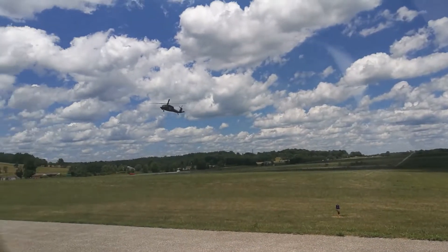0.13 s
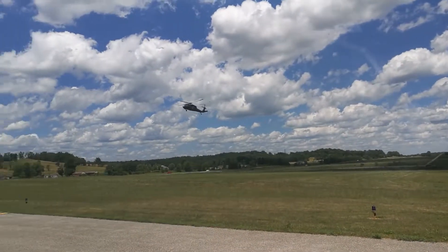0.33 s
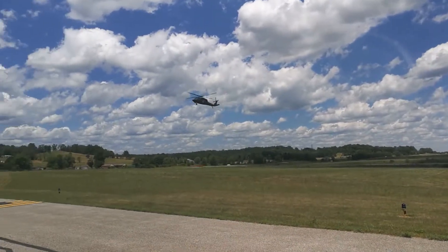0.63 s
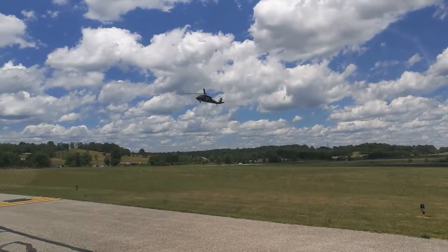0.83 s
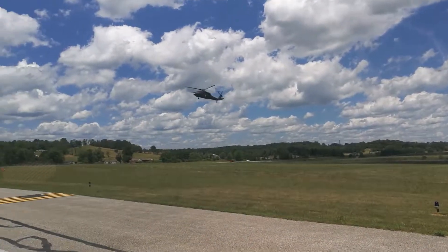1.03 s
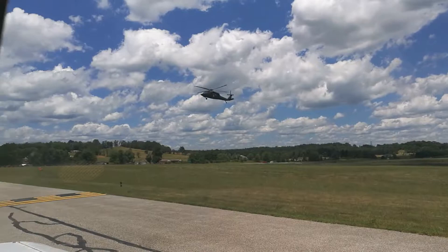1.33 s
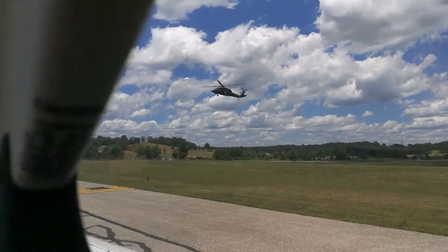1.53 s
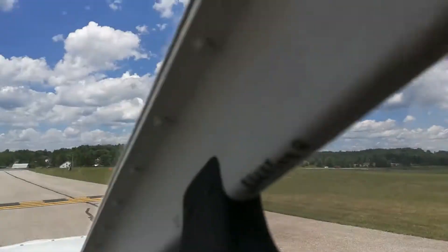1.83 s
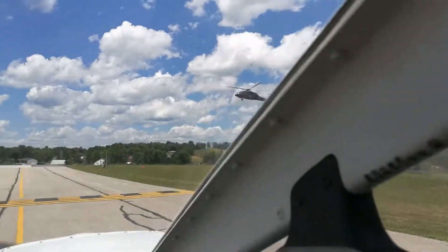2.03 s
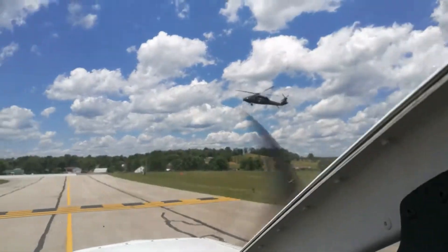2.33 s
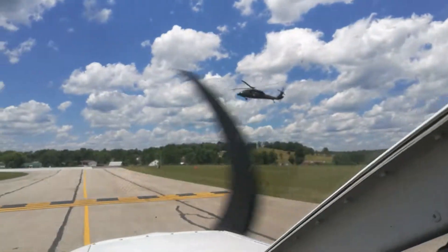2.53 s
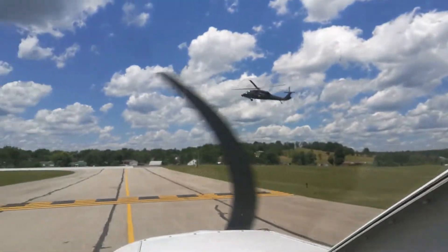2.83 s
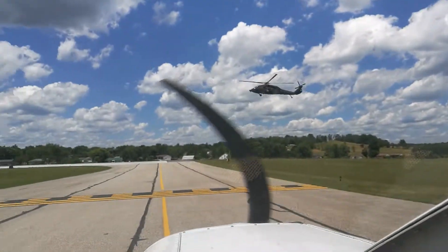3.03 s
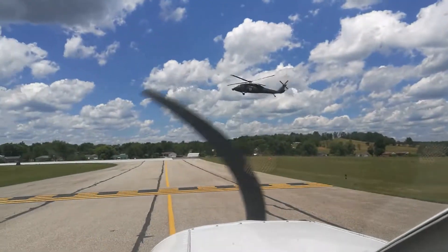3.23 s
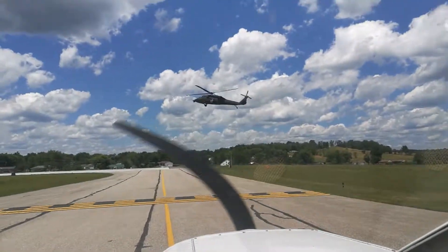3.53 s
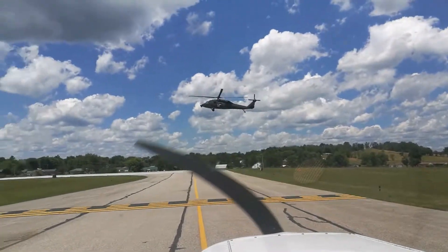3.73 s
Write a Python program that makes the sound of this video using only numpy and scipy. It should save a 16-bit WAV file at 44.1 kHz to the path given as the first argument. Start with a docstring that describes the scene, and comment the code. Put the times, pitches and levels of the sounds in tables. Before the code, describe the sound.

Small aircraft piston engine idling, low fluttering drone with rattling knocks and airy hiss in the cabin.

```python
"""Cabin of a small plane, its four-cylinder engine idling at about 900 rpm.
Propeller and exhaust throb once per firing (harmonics); rattle and knocks repeat every four firings
(looped noise; hits into resonators). Roar and slipstream hiss are noise bands pulsing with the blades,
over faint whines and a rumble. The microphone turns from side window to windscreen; now and then
something brushes it (noise bursts), and once the sound skips with a click."""
import sys
import numpy as np
from scipy import signal
from scipy.fft import irfft, next_fast_len
from scipy.io import wavfile

SR = 44100
rng = np.random.default_rng(int(sys.argv[2]) if len(sys.argv) > 2 else 0)


def bounce(signal):
    """Save signal as a 16-bit WAV file at the path given by the first command-line argument."""
    frames = np.transpose(np.atleast_2d(signal))
    limited = np.clip(frames, -1, 1)
    pcm = np.round(limited * 32767).astype(np.int16)
    wavfile.write(sys.argv[1], SR, pcm)


N = 171549

# Timing; the skip drops SKIP_SAMPLES, so the sources run that much longer.
FIRST_FIRING_S, FIRING_HZ, SPEEDUP_HZ_PER_S = 0.0134, 29.796, 0.021
CYLINDERS = 4  # firings per engine cycle
SKIP_S, SKIP_SAMPLES, JOIN_S = 1.4233, 1024, 0.00002
LENGTH = N + SKIP_SAMPLES
TIME_S = np.arange(LENGTH) / SR
FIRINGS = (TIME_S - FIRST_FIRING_S) * (FIRING_HZ + SPEEDUP_HZ_PER_S * TIME_S / 2)  # running count

# Microphone direction: start_s, turn (0 side window, 1 windscreen)
MIC_TURN = [(0, 0.062), (1.2, 0.082), (1.7, 0.29), (2.3, .6), (2.9, 0.86), (3.89, 0.98)]

# Throb, one row per multiple of the firing rate: side_peak_db, ahead_peak_db
THROB_HARMONICS = [(-18, -29.5), (-25.5, -22.5), (-16.5, -15.5), (-24, -26), (-23.5, -24), (-33, -48.5),
                   (-46.5, -72), (-57, -54), (-43, -41.5), (-49.5, -46.5)]
THROB_WOBBLE_DB, LOWEST_WOBBLE_DB, WOBBLE_HZ = 0.64, 4, 1.7

# Knocks of one engine cycle: place_firings, low_side_db, low_ahead_db, high_side_db, high_ahead_db
CYCLE_KNOCKS = [(0.172, 6.5, -12.5, -1, -4.5), (0.562, -4.5, -8.5, -2, -8.5), (1.129, 2.5, -5.5, 3, 3.5),
                (1.5, 0.5, -5, -7, -11.5), (2.149, 1, -8.5, -11, -6), (2.979, -2.5, -36, -8, -14)]
# Harder knocks: start_s (after the skip is cut), extra_db
HARD_KNOCKS = [(1.504, 1.5), (1.638, 5.5), (2.308, 2.5), (2.844, 0), (3.112, 1.5), (3.648, 7), (3.782, 5.5)]
# Resonances the knocks ring: centre_hz, width_hz, level_db, left_minus_right_db
LOW_RESONANCES = [(728, 49, -6, 15.5), (833, 150, -2, 15), (973, 41, 1.5, 7.5), (1047, 71, -0.5, -1.5),
                  (1145, 36, -4, 13)]
HIGH_RESONANCES = [(1494, 58, -1.5, 7.5), (1675, 24, 2.5, 6.7), (1848, 107, 2.5, 4.7),
                   (2344, 27, -6.5, 4.1)]
LOW_RING_RMS_DB, HIGH_RING_RMS_DB = -33.5, -39
LOW_TAIL_S, HIGH_TAIL_S = 0.0067, 0.011
LOW_GRIT, HIGH_GRIT = 0.39, 1  # noisy tail against clean hit
KNOCK_SPREAD_DB, KNOCK_JITTER_S = 0.1, 0.0005

# Rattle spectrum: freq_hz, density_db
RATTLE_SPECTRUM = [(40, -24), (105, 3), (160, 5.5), (205, 0), (260, 4), (370, -2.5), (480, -0.5), (590, -7),
                   (700, 0.5), (850, -8.5), (1100, -10.5), (1400, -19), (4000, -39)]
RATTLE_RMS_DB = -33

# Engine roar spectrum: freq_hz, density_db
ROAR_SPECTRUM = [(120, -17), (200, 4), (255, 3.5), (320, -4), (400, -5.5), (475, 1), (560, -3.5), (650, -5),
                 (770, -3.5), (880, -8.5), (1030, -5), (1200, -9), (1600, -24), (4000, -62)]
ROAR_SIDE_DB, ROAR_AHEAD_DB = -38, -31.5
# Slipstream hiss spectra, facing side window, door post, windscreen: freq_hz, density_db
HISS_SIDE_SPECTRUM = [(740, -32), (1250, -10), (1420, -7), (1730, 0.5), (1890, -8.5), (2030, -3.5),
                      (2330, -16), (2460, -22), (2790, -11.5), (3200, -27), (3480, -15), (4080, -23),
                      (4440, -22), (6420, -26.5), (6990, -29), (9300, -33), (10700, -23.5), (12200, -35.5),
                      (15600, -30)]
HISS_POST_SPECTRUM = [(740, -34), (1250, -19), (1330, -18.5), (1400, -4.5), (1480, -3.5), (1630, -8),
                      (1770, 2.5), (1870, 0.5), (2030, -3), (2330, -7), (2540, -13), (2910, -11),
                      (4390, -26.5), (5150, -23), (7450, -31.5), (9910, -27), (12500, -33), (15000, -34),
                      (15600, -34)]
HISS_AHEAD_SPECTRUM = [(740, -39), (1250, -15), (1400, 0), (1560, -3.5), (1870, -1), (1990, 1.5),
                       (2160, -18), (2310, -14), (2760, -14), (2910, -13.5), (3480, -16), (3950, -20),
                       (4260, -18), (4580, -23.5), (6290, -23.5), (7770, -31), (10200, -25), (12400, -32.5),
                       (15600, -32)]
HISS_SIDE_DB, HISS_POST_DB, HISS_AHEAD_DB = -40.5, -38.5, -38
# Colour added to all three hisses: freq_hz, gain_db
HISS_COLOUR = [(900, 3), (1300, 0), (1750, -3), (2100, -0.5), (2600, 0.5), (14000, 0.5)]
# Blade swell of roar and hiss: freq_hz, swell_peak_db
BLADE_SWELL = [(200, -3.5), (1000, 2.5), (2800, 0.6), (5000, 2.24), (12000, 2.2)]
SWELL_PEAK_FIRINGS, TREBLE_SWELL_PEAK_FIRINGS = 0.18, 0.38  # after the throb
ROAR_FLICKER_DB, ROAR_FLICKER_HZ = 1.09, 29

# Whine pitches: pitch_hz
WHINE_PITCHES = (1029, 2315, 3144)
# One row per whine: side_rms_db, post_rms_db, ahead_rms_db, wander_hz
WHINE_LEVELS = [(-45.5, -47, -41.5, 6.25), (-57.5, -49, -60, 10.4), (-65, -56.5, -71, 2.1)]
WHINE_WANDER_RATE_HZ, WHINE_FLUTTER_DB = 12.6, 2.5
# High whistle level: start_s, rms_db
WHISTLE_LEVEL = [(0, -75), (1.4, -73), (1.65, -63), (2.45, -63.5), (2.56, -58.5), (2.78, -57), (2.9, -68),
                 (3.89, -68)]
WHISTLE_HZ = 4980

# Cabin rumble spectrum: freq_hz, density_db
RUMBLE_SPECTRUM = [(8, 6), (16, -10), (28, 6.5), (45, -4), (70, -1), (105, -6), (135, -1), (165, -6.5),
                   (200, -16), (300, -44), (600, -60)]
RUMBLE_RMS_DB = -23.5

# Brush noise spectrum: freq_hz, density_db
BRUSH_SPECTRUM = [(1000, -10), (3000, 2), (3600, 4), (4500, -3), (7000, -7), (11000, -4), (15500, -17)]
# Scuffs close to the microphone: start_s, level_db
SCUFFS = [(1.2165, -33), (1.308, -40), (2.868, -49), (3.673, -45)]
SCUFF_RISE_S, SCUFF_DECAY_S = 0.0014, 0.014

# Stereo balance: freq_hz, left_minus_right_db
STEREO_LEAN = [(150, 0.5), (350, 1.5), (480, 1.5), (700, 6.5), (1100, 5), (1500, 9.5), (2300, 7), (3200, 0),
               (6000, 2), (8000, 3.5), (10300, 11.5), (12500, 0), (15000, -13)]
# Likeness of the two ears: freq_hz, coherence (0 to 1)
EAR_COHERENCE = [(100, .999), (160, 0.96), (260, 0.97), (500, 0.54), (1800, 0), (4000, .25), (8000, 0)]
RIGHT_LAG_S, LAG_ABOVE_HZ = 0.00061, 250  # engine heard from the left; bass fills the cabin evenly
CUTOFF_HZ = 15850


def from_db(db):
    """Decibels to gain."""
    return 10 ** (np.asarray(db) / 20)


def rms_one(x):
    """Scale to rms 1."""
    return x / np.sqrt(np.mean(x ** 2) + 1e-20)


def at_hz(points, hz):
    """Read a table on a log-frequency axis."""
    points = np.array(points)
    return np.interp(np.log(np.maximum(hz, 1)), np.log(points[:, 0]), points[:, 1])


def drift(rate_hz):
    """Slow chance of rms 1: noise through a two-pole lowpass, one value per 40 samples."""
    step, settle = 40, 2000
    r = np.exp(-2 * np.pi * rate_hz * step / SR)
    noise = rng.standard_normal(LENGTH // step + settle + 2)
    slow = signal.lfilter([1], [1, -2 * r, r * r], noise)[settle:]
    return np.interp(np.arange(LENGTH) / step, np.arange(len(slow)), rms_one(slow))


def turned():
    """Microphone direction at every sample."""
    return np.clip(np.interp(TIME_S, *np.transpose(MIC_TURN)), 0, 1)


def pan(lean_db):
    """Left and right gains of equal total power."""
    gains = from_db(np.array([lean_db, -lean_db]) / 2)
    return gains / np.sqrt(np.mean(gains ** 2, axis=0))


def cabin_noise(spectrum, size, colour=((1, 0), (2, 0))):
    """Coloured stereo noise, partly alike in both ears, later on the right; its middle has rms 1."""
    hz = np.arange(size // 2 + 1) * SR / size
    shared, own = np.exp(2j * np.pi * rng.random((2, len(hz))))
    alike = np.clip(at_hz(EAR_COHERENCE, hz), 0, 0.9995)
    lag_rad = 2 * np.pi * hz * RIGHT_LAG_S * hz ** 4 / (hz ** 4 + LAG_ABOVE_HZ ** 4)
    left, right = pan(at_hz(STEREO_LEAN, hz))
    right_mix = alike * np.exp(-1j * lag_rad) * shared + np.sqrt(1 - alike ** 2) * own
    ears = np.array([left * shared, right * right_mix])
    gain = from_db(at_hz(spectrum, hz) + at_hz(colour, hz)) * (hz > 0)
    # undo the lean and lag colouring of the middle
    middle = np.sqrt(1 + left * right * alike * np.cos(lag_rad))
    x = irfft(ears * gain / middle, size)
    return x / np.std(x.mean(axis=0))


def long_noise(spectrum, **options):
    """Cabin noise for the whole scene."""
    return cabin_noise(spectrum, size=next_fast_len(LENGTH), **options)[:, :LENGTH]


def resonate(x, hz, width_hz):
    """Two-pole resonance passing the same noise power whatever its width."""
    r = np.exp(-np.pi * width_hz / SR)
    zeros = np.sqrt(1 - r * r) * np.array([1, 0, -1])
    poles = [1, -2 * r * np.cos(2 * np.pi * hz / SR), r * r]
    return signal.lfilter(zeros, poles, x + 1e-18)


def throb():
    """One pressure dip per firing: negative cosines at multiples of the firing rate."""
    out, turn = 0, turned()
    for k, (side_db, ahead_db) in enumerate(THROB_HARMONICS, 1):
        wobble_db = (LOWEST_WOBBLE_DB if k == 1 else THROB_WOBBLE_DB) * drift(WOBBLE_HZ)
        level_db = side_db + (ahead_db - side_db) * turn + wobble_db
        out = out - from_db(level_db) * np.cos(2 * np.pi * k * FIRINGS)
    return out


def accent_db(s):
    """Extra strength if a knock falls on one of the hard ones."""
    heard_s = s - (s > SKIP_S) * SKIP_SAMPLES / SR
    return sum(db for hard_s, db in HARD_KNOCKS if abs(heard_s - hard_s) < 0.006)


def knock_hits(side_db, ahead_db):
    """One impulse per knock, slightly jittered, its strength following the microphone's turn."""
    cycles = np.arange(int(FIRINGS[-1] / CYLINDERS) + 1)
    places = (cycles[:, None] * CYLINDERS + np.array(CYCLE_KNOCKS)[:, 0]).ravel()
    chance = rng.standard_normal((len(places), 2))
    turn, hits = turned(), np.zeros(LENGTH)
    for k, (place, (late, strong)) in enumerate(zip(places, chance)):
        row = k % len(CYCLE_KNOCKS)
        i = int((np.interp(place, FIRINGS, TIME_S) + KNOCK_JITTER_S * late) * SR)
        if 0 <= i < LENGTH and place < FIRINGS[-1]:
            level_db = side_db[row] + (ahead_db[row] - side_db[row]) * turn[i]
            hits[i] += from_db(level_db + accent_db(TIME_S[i]) + KNOCK_SPREAD_DB * strong)
    return hits


def knocking(side_db, ahead_db, resonances, tail_s, grit):
    """Sharp hits with gritty decaying tails excite the engine's resonances; rms 1."""
    hits = knock_hits(side_db, ahead_db)
    r = np.exp(-1 / (tail_s * SR))
    envelope = signal.lfilter([np.sqrt(1 - r * r)], [1, -r], hits + 1e-18)
    tails = envelope * rng.standard_normal((2, LENGTH))
    late_hits = np.interp(TIME_S - RIGHT_LAG_S, TIME_S, hits)
    bursts = np.array([hits, late_hits]) + grit * tails
    out = 0
    for k, (hz, width_hz, db, lean_db) in enumerate(resonances):
        gains = (-1) ** k * from_db(db) * pan(lean_db)[:, None]  # alternating polarity
        out = out + gains * resonate(bursts, hz, width_hz)
    return rms_one(out)


def knocks():
    """Engine clatter: a hollow ring near 1 kHz and a brighter one above it."""
    _, low_side, low_ahead, high_side, high_ahead = np.transpose(CYCLE_KNOCKS)
    low = knocking(low_side, low_ahead, LOW_RESONANCES, LOW_TAIL_S, LOW_GRIT)
    high = knocking(high_side, high_ahead, HIGH_RESONANCES, HIGH_TAIL_S, HIGH_GRIT)
    return from_db(LOW_RING_RMS_DB) * low + from_db(HIGH_RING_RMS_DB) * high


def rattle():
    """Airframe shudder: one stretch of noise repeated every engine cycle."""
    size = int(CYLINDERS * SR / FIRING_HZ)
    cycle, phase = cabin_noise(RATTLE_SPECTRUM, size=size), np.arange(size) / size
    ears = [np.interp(FIRINGS / CYLINDERS, phase, ear, period=1) for ear in cycle]
    return from_db(RATTLE_RMS_DB) * np.array(ears)


def steady_air():
    """Engine roar and slipstream hiss; level and colour follow the microphone's turn."""
    turn = turned()
    roar_db = ROAR_SIDE_DB + (ROAR_AHEAD_DB - ROAR_SIDE_DB) * turn
    air = from_db(roar_db) * long_noise(ROAR_SPECTRUM)
    hisses = [(HISS_SIDE_SPECTRUM, HISS_SIDE_DB), (HISS_POST_SPECTRUM, HISS_POST_DB),
              (HISS_AHEAD_SPECTRUM, HISS_AHEAD_DB)]
    for k, (spectrum, db) in enumerate(hisses):
        fade = np.sqrt(np.maximum(1 - abs(2 * turn - k), 0))  # equal-power crossfade
        air = air + from_db(db) * fade * long_noise(spectrum, colour=HISS_COLOUR)
    return air


def roar():
    """Roar and hiss split into bands; each swells with the blades and flickers by itself."""
    rest, out = steady_air(), 0
    for edge_hz in (700, 2000, 4000, 8000, 18000):
        band = signal.sosfiltfilt(signal.butter(4, edge_hz, fs=SR, output="sos"), rest)
        rest = rest - band
        peak = TREBLE_SWELL_PEAK_FIRINGS if edge_hz > 8000 else SWELL_PEAK_FIRINGS
        swell_db = at_hz(BLADE_SWELL, edge_hz / np.sqrt(2)) * np.cos(2 * np.pi * (FIRINGS - peak))
        out = out + band * from_db(swell_db + ROAR_FLICKER_DB * drift(ROAR_FLICKER_HZ))
    return out


def whistle():
    """A faint steady sine whose level swells once."""
    level_db = np.interp(TIME_S, *np.transpose(WHISTLE_LEVEL))
    return np.sqrt(2) * from_db(level_db) * np.sin(2 * np.pi * WHISTLE_HZ * TIME_S)


def whines():
    """Spinning parts: faint sines wavering in pitch and level, which follows the microphone's turn."""
    out = 0
    for hz, (*levels_db, wander_hz) in zip(WHINE_PITCHES, WHINE_LEVELS):
        phase = 2 * np.pi * np.cumsum(hz + wander_hz * drift(WHINE_WANDER_RATE_HZ)) / SR
        flutter_db = WHINE_FLUTTER_DB * drift(WHINE_WANDER_RATE_HZ)
        db = np.interp(turned(), [0, 0.5, 1], levels_db) + flutter_db
        gains = pan(at_hz(STEREO_LEAN, hz))[:, None]
        out = out + gains * np.sqrt(2) * from_db(db) * np.sin(phase)
    return out


def rumble():
    """Steady low cabin noise."""
    return from_db(RUMBLE_RMS_DB) * long_noise(RUMBLE_SPECTRUM)


def brush():
    """Scuffs close to the microphone: bright noise with a fast rise and exponential decay."""
    envelope = 0
    for start_s, db in SCUFFS:
        age_s = np.maximum(TIME_S[:N] - start_s, 0)
        rise = np.minimum(age_s / SCUFF_RISE_S, 1)
        decay = np.exp(-np.maximum(age_s - SCUFF_RISE_S, 0) / SCUFF_DECAY_S)
        envelope = envelope + from_db(db) * rise * decay
    return envelope * long_noise(BRUSH_SPECTRUM)[:, :N]


def skip(x):
    """A short stretch of sound drops out; the abrupt join clicks."""
    after = 0.5 + 0.5 * np.tanh((TIME_S[:N] - SKIP_S) / JOIN_S)
    return x[:, :N] * (1 - after) + x[:, SKIP_SAMPLES:] * after


def scene():
    """Everything heard in the cabin; the scuffs are untouched by the skip."""
    engine = throb() + knocks() + rattle()
    background = roar() + whines() + whistle() + rumble()
    return skip(engine + background) + brush()


def record(dry):
    """Steep elliptic lowpass, run both ways for zero phase."""
    return signal.sosfiltfilt(signal.ellip(10, 0.05, 70, CUTOFF_HZ, fs=SR, output="sos"), dry)


dry = scene()
out = record(dry)
bounce(out)
```